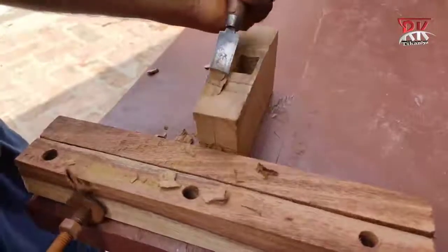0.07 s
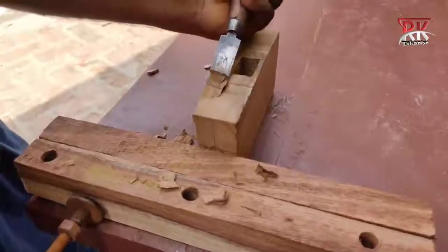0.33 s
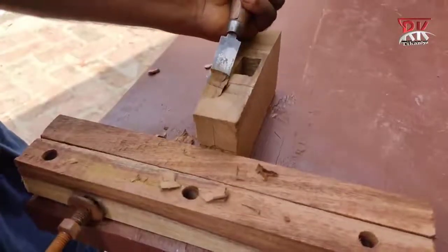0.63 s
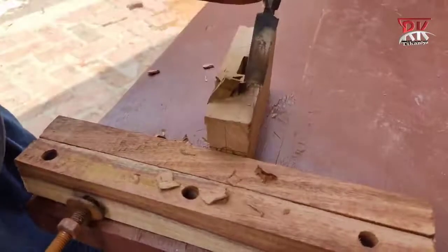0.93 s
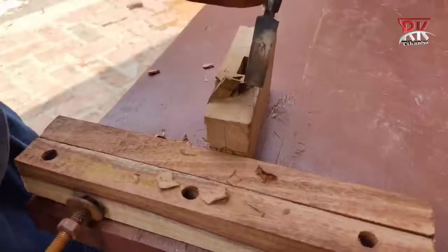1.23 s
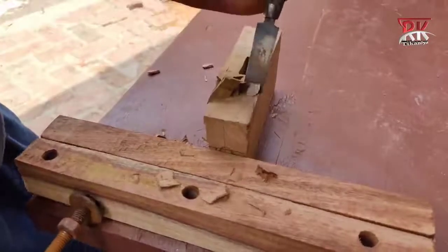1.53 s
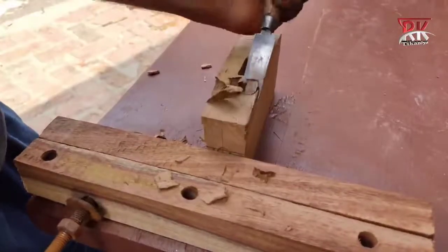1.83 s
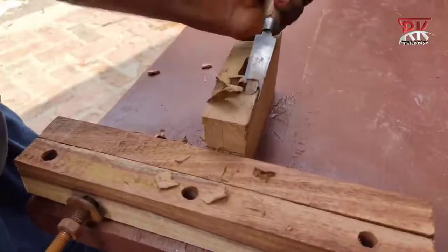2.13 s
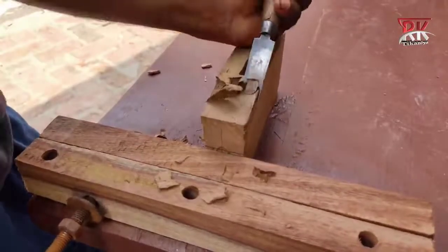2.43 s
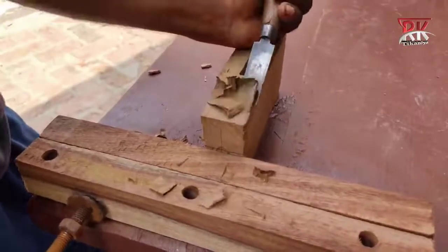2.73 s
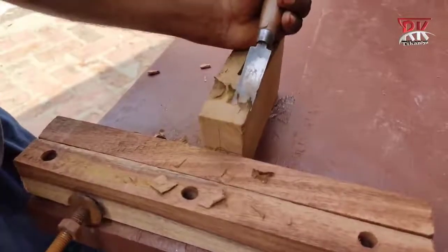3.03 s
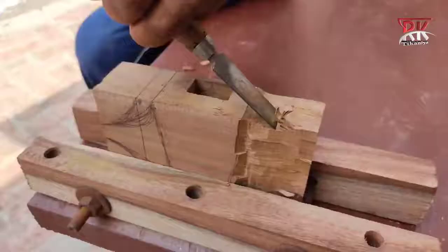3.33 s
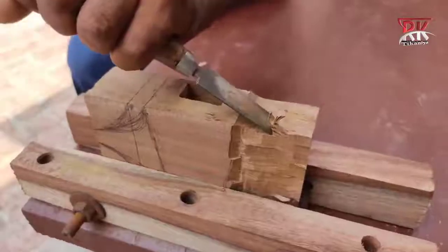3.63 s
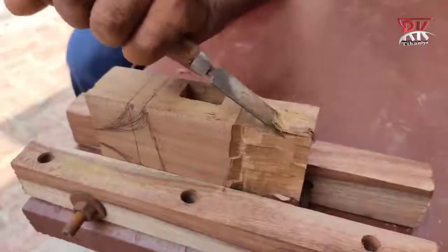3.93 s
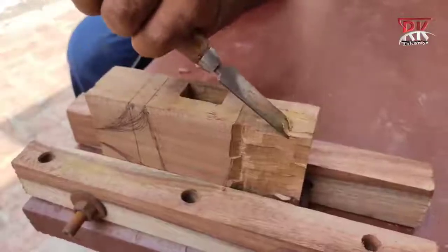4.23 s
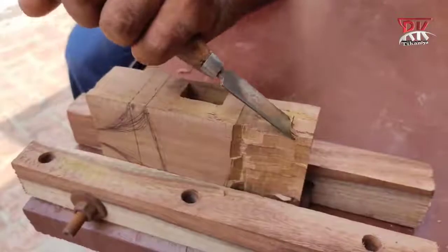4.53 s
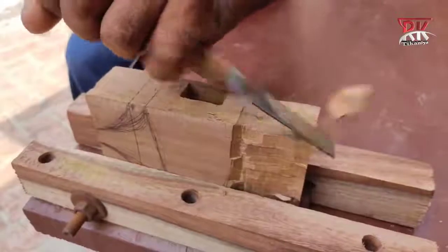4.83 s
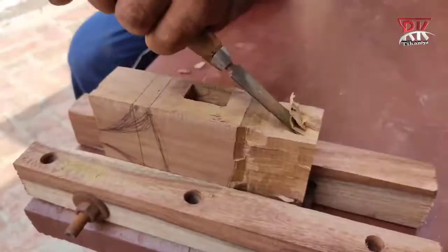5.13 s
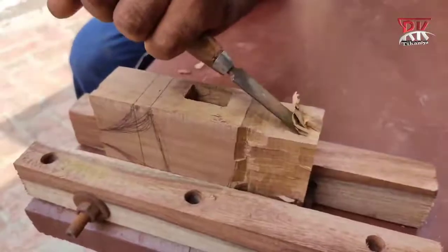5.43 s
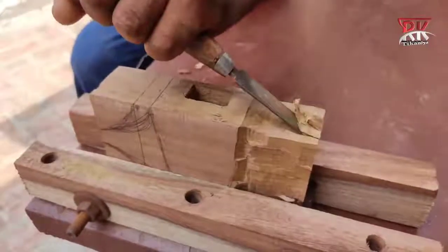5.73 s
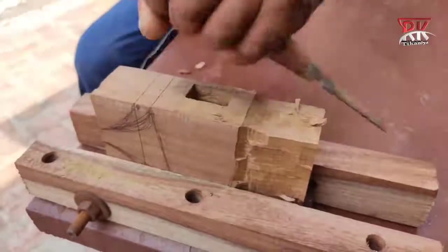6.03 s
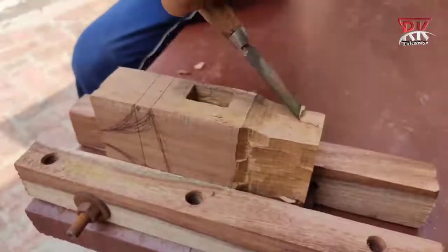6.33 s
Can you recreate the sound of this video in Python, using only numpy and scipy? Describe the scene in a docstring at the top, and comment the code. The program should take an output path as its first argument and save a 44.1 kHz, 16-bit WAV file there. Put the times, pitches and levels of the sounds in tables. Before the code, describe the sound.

A wooden-handled chisel is struck again and again into a hardwood block clamped at a workbench, about three blows a second. Each is a sharp crack and woody knock over a low bench thud, a few with a thin ring from the blade. Faint ticks of splitting fibres come between blows. A lighter tap and a brief scrape finish. The sound is close, in a quiet yard with a short echo.

```python
"""At a bench in a quiet yard, a wooden-handled chisel is struck again and again into a clamped block.
Each impact excites damped modes: the edge snaps, the handle cracks, the hardwood block knocks and,
last, the heavy bench thuds. A loose blade rings, and the yard walls reflect the blows.
Between blows the handle is bumped, the edge is set down, fibres fracture and the block shifts.
Stick-slip friction sounds as a chip is levered up and, at the end, as the edge drags over the grain."""
import sys
import numpy as np
from scipy import signal
from scipy.fft import rfft, irfft
from scipy.io import wavfile
from scipy.ndimage import uniform_filter1d

SR = 44100
rng = np.random.default_rng(int(sys.argv[2]) if len(sys.argv) > 2 else 0)


def unload_audio(sound):
    """Save the sound as a 16-bit wav file, at the path given as the first command line argument."""
    columns = np.transpose(np.atleast_2d(sound))
    # keep every value between -1 and 1, then stretch to whole-number steps
    steps = np.round(np.clip(columns, -1, 1) * 32767)
    wavfile.write(sys.argv[1], SR, steps.astype(np.int16))


N = 289737
AGE = np.arange(SR // 4) / SR  # time since an impact [s]
TIGHT = 0  # looseness of a firmly held blade

# outdoor background: (frequency [Hz], spectral level [dB])
AIR_SPECTRUM = [(15, 14.5), (25, -6), (70, -4.5), (160, -0.5), (260, -2), (530, -15.5), (790, -17),
                (1400, -21), (5300, -31), (8500, -31.5), (9700, -40), (10600, -61.5), (15000, -85)]
# diffuse sound at the two microphone ports: (frequency [Hz], left-right correlation [0-1])
COHERENCE = [(40, 0.34), (140, 0.78), (300, 0.98), (650, 0.1), (1400, 0.017), (9000, 0.056)]
# full blows: (time [s], force [dB], time until the edge seats [s], block resonance [Hz],
#   handle resonance [Hz], its share of the crack [dB], blade looseness [0-1], bench share [dB], echo [dB])
BLOWS = [(0.0809, -1, 0.019, 998, 2220, -16, 0.84, 1.5, -7.5),
         (0.4412, 3, 0.028, 770, 1363, -20, 0.37, 0, -9.5), (0.7763, 3, 0.035, 790, 2114, -8, 0.65, 1, -9),
         (1.077, -8.5, 0.026, 920, 1500, -6, TIGHT, 1.5, -5.5),
         (1.4189, 1.5, 0.023, 646, 1564, 3.5, TIGHT, 1.5, -7),
         (1.7519, .5, .039, 654, 1522, -3, 0.5, -1, -7),
         (2.2854, -0.4, 0.026, 772, 2400, -2.5, 0.93, 2, -18),
         (2.6215, 5, 0.023, 867, 1450, -19, TIGHT, 0, -11.5),
         (2.9404, 2.5, 0.0244, 918, 1516, -7, TIGHT, -4, -9.5),
         (3.2834, 1.5, 0.017, 895, 1405, 1, TIGHT, -3.5, -14),
         (3.8012, 0.5, 0.0093, 658, 1480, -2.5, TIGHT, -3.5, -9.5),
         (4.1203, 0, 0.015, 830, 1350, -3, TIGHT, 2.5, -11.5),
         (4.3817, 0, 0.019, 836, 1440, -8, TIGHT, 2, -10),
         (4.6507, -1.05, 0.018, 820, 1290, 2, TIGHT, 1, -8),
         (4.9142, -2.5, 0.014, 990, 1610, 0.5, TIGHT, -2, -10),
         (5.288, -4, 0.022, 813, 1300, -8.5, TIGHT, 0, -1.5),
         (5.6064, 1, 0.026, 788, 1437, -11, TIGHT, 2, -6),
         (5.9374, 0.5, 0.02, 888, 1997, -12.5, TIGHT, 0, -10.5)]
# each part's response to a blow: (level at force 0 [dB], growth with force [dB/dB])
BLOW_RESPONSE = {"push": (-29.5, 1), "thud": (-22.5, 0.56), "knock": (-23, 1.05), "crack": (-22, 1),
                 "snap": (-26, 0.97), "blade": (-35, 1)}
# the block is clamped end-on, then lengthwise:
#   (thud [dB], knock [dB], snap brightness [dB], bench rocking back [dB], left-right [dB])
END_ON, LENGTHWISE = (-1.6, 0.8, -1.5, -28, 1.5), (0.5, -0.6, 0.5, -19.5, 0.8)
# contact at the edge: (frequency [Hz], spectral level [dB])
SNAP_SPECTRUM = [(1500, -24), (2700, 3), (3300, 3), (4200, 3), (5200, -1), (6500, -1.5), (7600, 3),
                 (8800, 0), (9600, -8), (10600, -15), (13500, -18.5), (15200, -17.5), (16500, -37)]
# dense modes of the handle: (frequency [Hz], spectral level [dB])
CRACK_SPECTRUM = [(500, -51), (900, -3.5), (1150, 1.5), (1500, 4), (2250, 2), (2750, -2.5), (3200, -16),
                  (5000, -59)]
# clamped block: (frequency [Hz], level [dB])
BLOCK_MODES = [(570, 1), (625, 2.5), (690, -4), (750, 2.5), (835, 0), (878, 0.5), (960, -2), (1060, -1)]
# the bench's response to a force pulse: (frequency [Hz], gain [dB])
PUSH_SPECTRUM = [(15, 4), (26, -6.5), (45, -5), (70, 2), (110, 12.5), (160, -34), (400, -43), (1500, -69)]
# bench and vise: (frequency [Hz], level [dB], start of decay [s], t60 [s])
BENCH_MODES = [(130.6, -7.5, 0.025, 0.089), (171.5, -2.5, 0.015, 0.12), (252.5, -2.5, 0.004, 0.06),
               (324.2, -3, 0.017, 0.07), (400, -6.5, 0.0052, 0.076), (463.7, -3, 0.0072, 0.051)]
# reverberation between the walls: (frequency [Hz], t60 [s])
YARD_T60 = [(100, 0.43), (300, 0.49), (1000, 0.42), (3000, .44), (9000, 0.39), (14000, 0.28)]
# colour of the reflections: (frequency [Hz], gain [dB])
YARD_COLOUR = [(30, -4), (90, -16.5), (160, 8), (320, 4.5), (520, -5), (800, 1.5), (1500, 1.5), (3000, 2),
               (9500, 2), (10300, -11), (14500, -8.5), (15500, -34)]
# bumps on the handle, too soft to cut:
#   (time [s], force [dB], block resonance [Hz], handle resonance [Hz], its share of the crack [dB])
REBOUNDS = [(0.165, -8, 767, 1394, -0.5), (0.324, -23, 1060, 1110, 14), (2.3167, -4, 924, 1485, -4.5)]
# each part of a rebound: (level at force 0 [dB])
REBOUND_DB = {"thud": -25, "knock": -20.5, "crack": -25.5}
# fibres splitting: (time [s], level [dB], left-right [dB])
SPLINTERS = [(0.721, -52.5, -8), (2.4508, -58.5, -7), (3.4565, -53.5, 8), (4.3607, -49.5, -4),
             (4.499, -40, 5), (5.174, -62, 3), (5.848, -44, -4), (6.2779, -50, 5), (6.3124, -42.5, -2)]
# one fracture: (frequency [Hz], spectral level [dB])
FIBRE_SPECTRUM = [(400, -32), (1500, 2), (5000, -6.5), (7000, 6), (8500, 8.5), (10000, -8.5), (15000, -23)]
# the block shifts in the vise: (time [s], level [dB])
SHIFTS = [(0.925, -38.5), (1.15, -40.5), (3.461, -39)]
# the edge is set down: (time [s], force [dB], handle resonance [Hz], its share of the crack [dB], echo [dB])
TAPS = [(3.5058, -14.5, 1600, -6, -4), (5.2076, -14, 1470, 12, -9.5), (6.302, -8, 1404, 2, -14.5),
        (6.419, -28.5, 835, 1, -3.5)]
# each part of a tap: (level at force 0 [dB])
TAP_DB = {"thud": -23, "knock": -29, "crack": -22.5, "snap": -31}
# the edge drags over the wood: (time [s], level [dB])
DRAG_ENVELOPE = [(6.41, -80), (6.46, -52.5), (6.52, -44), (6.57, -47.5)]
# the two ports resonate at different treble pitches: (frequency [Hz], left-right [dB])
PORT_BALANCE = [(1000, 2), (1600, -0.5), (2200, -2.5), (3400, 1.5), (4800, -1.5), (7300, -5.5),
                (8700, 10.5), (9600, 5), (11000, -0.5)]


def amp(db):
    """Amplitude ratio: tenfold for every 20 dB."""
    return 10 ** (np.asarray(db) / 20)


def read(points, hz):
    """Interpolation on a log-frequency axis."""
    f, value = np.transpose(points)
    return np.interp(np.log(hz + 1), np.log(f + 1), value)


def add(mix, s, sound):
    """Superposition: a stereo sound adds to the mix from time s."""
    part = mix[:, max(round(s * SR), 0):][:, :sound.shape[1]]
    part += sound[:, :part.shape[1]]


def sized(x, db, reference_s=.04):
    """Equal energy: x gets the energy of level db held for reference_s."""
    return x * amp(db) / np.sqrt(np.mean(x ** 2) * x.shape[-1] / SR / reference_s + 1e-20)


def sides(db):
    """Left and right gains: a level difference gives direction."""
    return amp(np.array([[.5], [-.5]]) * db)


def colour(x, spectrum, size=4096):
    """Minimum-phase filter: the phase follows from the log gain by the Hilbert transform."""
    log_gain = np.log(amp(read(spectrum, abs(np.fft.fftfreq(size, 1 / SR)))))
    taps = np.fft.ifft(np.exp(np.conj(signal.hilbert(log_gain)))).real
    return signal.fftconvolve(x, taps[None, :size // 2], axes=1)[:, :x.shape[1]]


def diffuse(count):
    """Diffuse noise is coherent at the two ports only at long wavelengths."""
    a, b = rfft(rng.standard_normal((2, count)))
    same = np.clip(read(COHERENCE, np.fft.rfftfreq(count, 1 / SR)), -1, 1)
    return irfft(np.array([a, same * a + np.sqrt(1 - same ** 2) * b]), count)


def near_noise(coherence):
    """Partial coherence: the ports share part of a nearby source's noise."""
    shared, *own = rng.standard_normal((3, len(AGE)))
    return np.sqrt(coherence) * shared + np.sqrt(1 - coherence) * np.array(own)


def air(level_db=-49):
    """The outdoor background is a steady diffuse field, strongest in the bass."""
    x = irfft(rfft(diffuse(N)) * amp(read(AIR_SPECTRUM, np.fft.rfftfreq(N, 1 / SR))), N)
    return amp(level_db) * x / x.std()


def snap(bright_db, t60=0.012, scatter_db=-18, scatter_t60=0.11):
    """A brief, hard contact has a broad spectrum; a duller scatter of parting fibres follows."""
    onset = 1 - np.exp(-AGE / .0004)
    contact = near_noise(0.13) * amp(-60 * AGE / t60)
    scatter = near_noise(0.055) * amp(scatter_db - 60 * AGE / scatter_t60)
    scatter = colour(scatter, [(9600, -3.0), (11000, 1.0), (15000, -42)])
    burst = colour((contact + scatter) * onset, SNAP_SPECTRUM)
    return colour(burst, [(4500, 0), (7300, bright_db)])


def blade(hz=8660, t60=0.17, linger_db=-18, linger_t60=0.24, upper_hz=11350, upper_db=-29):
    """Free vibration in two modes of the steel: a quick ping and a faint after-ring."""
    port_phase = np.array([[0], [.8]])
    decay = amp(-60 * AGE / t60) + amp(linger_db - 60 * AGE / linger_t60)
    upper = np.sin(2 * np.pi * upper_hz * AGE + port_phase) * amp(upper_db - 60 * AGE / linger_t60)
    return np.sin(2 * np.pi * hz * AGE + port_phase) * decay + upper


def crack(centre_hz, ring_db, swell_s=0.0023, t60=0.034, ring_t60=0.042, split=0.08, split_db=-3):
    """Modal overlap: the handle's dense modes merge into noise, and three close ones ring with it."""
    dense = colour(near_noise(0.3) * amp(-60 * AGE / t60), CRACK_SPECTRUM)
    ring = 0
    for offset, db in ((0, 0), (-split, split_db), (split, split_db)):
        phase = 2 * np.pi * rng.random() + np.array([[.5], [-.5]])
        mode = np.sin(2 * np.pi * centre_hz * (1 + offset) * AGE + phase)
        ring = ring + mode * amp(db - 60 * AGE / ring_t60)
    return (sized(dense, 0) + sized(ring, ring_db)) * (1 - np.exp(-(AGE / swell_s) ** 2))


def knock(centre_hz, seat_s, swell_share=0.31, t60=0.14, focus_db=9, focus_hz=50, seated_gain=0.36):
    """Contact damping: the block's modes ring while the edge drives in, and drop when it seats."""
    hz, db = np.transpose(BLOCK_MODES)[:, :, None]
    detune, phase, skew = rng.standard_normal((3, len(hz), 1))
    gain = amp(db + focus_db * np.exp(-((hz - centre_hz) / focus_hz) ** 2))
    angle = 2 * np.pi * (hz * (1 + 0.0097 * detune) * AGE + phase)
    ring = np.array([(gain * np.sin(angle + side * 0.64 * skew)).sum(0) for side in (1, -1)])
    onset = 1 - np.exp(-(AGE / (swell_share * seat_s)) ** 2)
    damping = seated_gain + (1 - seated_gain) * (.5 - .5 * np.tanh((AGE - seat_s) / 0.00079))
    return ring * onset * amp(-60 * AGE / t60) * damping


def push(contact_s=0.0045, rebound_s=0.019, rebound_share=0.12, pan_db=4.5):
    """Elastic deflection: a force pulse presses the whole bench down, and it springs back."""
    press = np.exp(-((AGE - 2 * contact_s) / contact_s) ** 2)
    recoil = rebound_share * np.exp(-((AGE - contact_s - rebound_s) / contact_s) ** 2)
    return colour((press - recoil)[None], PUSH_SPECTRUM) * sides(pan_db)


def thud(slowness=0.61, scatter=0.0275, linger_db=-19, linger_t60=0.36, pan_db=2.1):
    """Inertia: the heavy bench's modes build slowly and hum on, shifting a little with the grip."""
    out = np.zeros((2, len(AGE)))
    for hz, db, hold_s, t60 in BENCH_MODES:
        detune, phase, skew = rng.standard_normal(3)
        onset = 1 - np.exp(-(AGE / (hold_s * slowness)) ** 3)
        decay = amp(-60 * np.maximum(AGE - hold_s, 0) / t60) + amp(linger_db - 60 * AGE / linger_t60)
        angle = 2 * np.pi * (hz * (1 + scatter * detune) * AGE + phase)
        out += amp(db) * onset * decay * np.sin(angle + np.array([[1], [-1]]) * skew * hz / 1600)
    return out * sides(pan_db) * (1 - (AGE / AGE[-1]) ** 10)


def yard_echo(x, build_s=0.016, swell_s=0.12, swell_db=9.0, ripple_db=2.5, patchy_db=2.0):
    """Reverberation: the sound's broad spectrum lingers between the walls, swells once more and dies."""
    count, size = 28672, 1024  # samples in the tail and in a frame
    hz, t, noise = signal.stft(diffuse(count), SR, nperseg=size)
    power = (abs(signal.stft(x, SR, nperseg=size)[2]) ** 2).sum(2)
    blur = np.exp(-((hz[:, None] - hz) / (0.097 * hz[:, None] + 10)) ** 2)
    power = power @ blur.T / blur.sum(1)
    swell = amp(swell_db * (.5 + .5 * np.tanh((t - swell_s) / 0.02)))
    decay = amp(-60 * t / read(YARD_T60, hz)[:, None]) * swell
    # reflections interfere: lasting ripples over frequency, and passing patches
    patches = uniform_filter1d(rng.standard_normal(decay.shape), size=7, axis=0)
    patches = uniform_filter1d(patches, size=3, axis=1)
    uneven = amp(ripple_db * rng.standard_normal((len(hz), 1)) + patchy_db * patches / patches.std())
    uneven = uneven ** np.minimum(hz[:, None] / 600, 1)  # long waves interfere less
    gain = np.sqrt(power / power.mean()) * amp(read(YARD_COLOUR, hz))
    tail = signal.istft(noise * decay * uneven * gain[:, :, None], SR, nperseg=size)[1]
    tail *= 1 - np.exp(-(np.arange(tail.shape[1]) / SR / build_s) ** 2)
    return tail * np.sqrt(np.sum(x ** 2) / 2 / (np.mean((decay * uneven) ** 2) * count))


def with_echo(x, echo_db):
    """Direct and reflected sound superpose."""
    out = amp(echo_db) * yard_echo(x)
    add(out, 0, x)
    return out


def chopping(turned_s=3.4, rock_back_s=.105, usual_seat_s=0.027, doubling_db=4.5, loose_db=-7):
    """Impact excitation: one force drives edge, handle, block and bench; the clamping sets the shares."""
    out = np.zeros((2, N))
    for s, force_db, seat_s, block_hz, handle_hz, ring_db, loose, bench_db, echo_db in BLOWS:
        thud_db, knock_db, bright_db, rock_db, pan_db = END_ON if s < turned_s else LENGTHWISE
        db = {part: level + slope * force_db for part, (level, slope) in BLOW_RESPONSE.items()}
        # a longer bite presses the bench down harder; a loose blade passes less on
        bite_db = doubling_db * np.log2(seat_s / usual_seat_s) + loose_db * loose
        wood = sized(knock(block_hz, seat_s), db["knock"] + knock_db)
        wood += sized(crack(handle_hz, ring_db), db["crack"])
        bench = sized(thud(), db["thud"] + thud_db + bench_db) + sized(push(), db["push"] + bite_db)
        edge = sized(snap(bright_db), db["snap"])
        add(out, s, with_echo(wood * sides(pan_db) + bench + edge, echo_db))
        add(out, s, loose * sized(blade(), db["blade"]))
        add(out, s + rock_back_s, sized(bump(), db["thud"] + rock_db + bench_db))
    return out


def rebounds(seat_s=0.022, echo_db=-10, pan_db=2.0):
    """Secondary impacts excite the wood without cutting, so the edge does not snap."""
    out = np.zeros((2, N))
    for s, force_db, block_hz, handle_hz, ring_db in REBOUNDS:
        wood = sized(knock(block_hz, seat_s), REBOUND_DB["knock"])
        wood += sized(crack(handle_hz, ring_db), REBOUND_DB["crack"])
        bench = sized(thud(), REBOUND_DB["thud"])
        add(out, s, amp(force_db) * with_echo(wood * sides(pan_db) + bench, echo_db))
    return out


def bump():
    """A slow movement excites mainly the bench's low modes."""
    return colour(thud(slowness=1.3), [(200, -0.5), (320, -7.5), (500, -16.5)])


def tick(db, pan_db, t60=0.012, scatter_db=-24, scatter_t60=0.29):
    """Acoustic emission: a tiny fracture of fibres releases a burst of noise."""
    decay = amp(-60 * AGE / t60) + amp(scatter_db - 60 * AGE / scatter_t60)
    return sized(colour(near_noise(0.73) * decay, FIBRE_SPECTRUM), db) * sides(pan_db)


def splinters(block_db=-58, block_hz=900, seat_s=0.0054):
    """Each fracture ticks and faintly excites the block's modes."""
    out = np.zeros((2, N))
    for s, db, pan_db in SPLINTERS:
        add(out, s, tick(db, pan_db) + sized(knock(block_hz, seat_s), block_db))
    return out


def block_shifts():
    """Structure-borne sound: the block shifts in the vise and the bench bumps softly."""
    out = np.zeros((2, N))
    for s, db in SHIFTS:
        add(out, s, sized(bump(), db))
    return out


def prying(start_s=2.068, gap_s=.03, count=6, uneven_db=4.0):
    """Stick-slip: a levered chip gives way in evenly spaced slips, each a tick and a soft knock."""
    out = np.zeros((2, N))
    for k in range(count):
        slip = tick(db=-61.5, pan_db=-6.5) + sized(knock(centre_hz=720, seat_s=0.016), -55)
        add(out, start_s + k * gap_s, slip * amp(uneven_db * rng.standard_normal()))
    return out


def taps(block_hz=1030, seat_s=0.02, bright_db=1, pan_db=2):
    """Light impacts of the edge bring out the hollow resonance of the handle."""
    out = np.zeros((2, N))
    for s, force_db, handle_hz, ring_db, echo_db in TAPS:
        wood = sized(knock(block_hz, seat_s), TAP_DB["knock"])
        wood += sized(crack(handle_hz, ring_db), TAP_DB["crack"])
        bench = sized(thud(slowness=0.91), TAP_DB["thud"])
        edge = sized(snap(bright_db), TAP_DB["snap"])
        add(out, s, amp(force_db) * with_echo(wood * sides(pan_db) + bench + edge, echo_db))
    return out


def drag(slips_per_s=7000):
    """Sliding friction: the edge crosses the grain in tiny random slips that merge into a rasp."""
    slips = rng.standard_normal((2, N)) * (rng.random(N) < slips_per_s / SR)
    rasp = colour(slips, [(200, 1), (700, -2.0), (2000, -0.5), (5000, -8),
                          (8500, -6.5), (10500, -31), (15000, -40)])
    s, db = np.transpose(DRAG_ENVELOPE)
    return rasp / rasp.std() * amp(np.interp(np.arange(N) / SR, s, db, left=-150))


def scene():
    """The work at the bench and the yard's background add by superposition."""
    return chopping() + rebounds() + taps() + prying() + block_shifts() + splinters() + drag() + air()


def record(dry, ceiling=0.57, cutoff_hz=16500):
    """Port resonances colour each side, saturation rounds the peaks and a low-pass limits the band."""
    ported = irfft(rfft(dry) * sides(read(PORT_BALANCE, np.fft.rfftfreq(N, 1 / SR))), N)
    limited = ported / (1 + (ported / ceiling) ** 4) ** (1 / 4)
    low_pass = signal.firwin(511, cutoff_hz, window=("kaiser", 9), fs=SR)
    return signal.oaconvolve(limited, low_pass[None], "same")


dry = scene()
out = record(dry)
unload_audio(out)
```